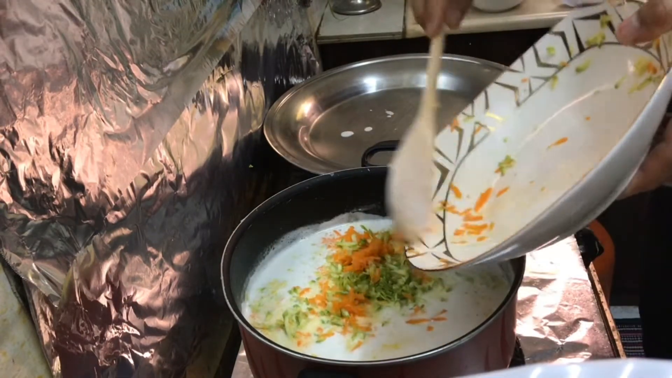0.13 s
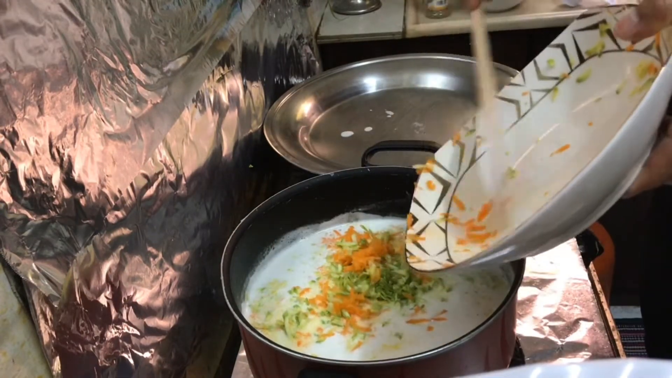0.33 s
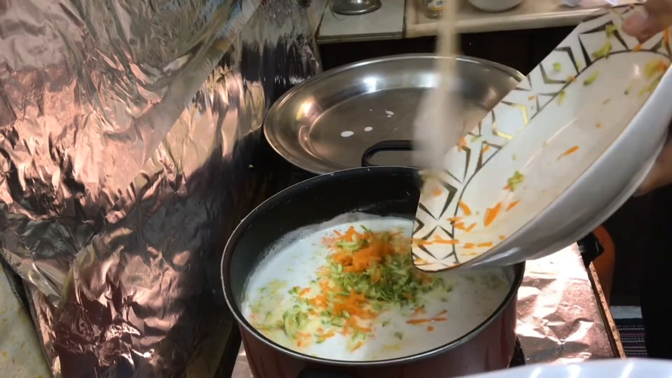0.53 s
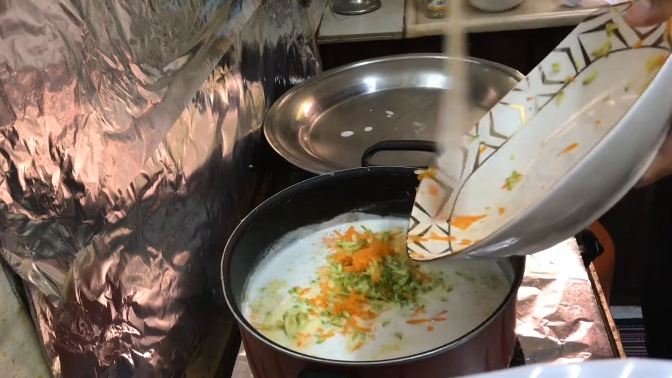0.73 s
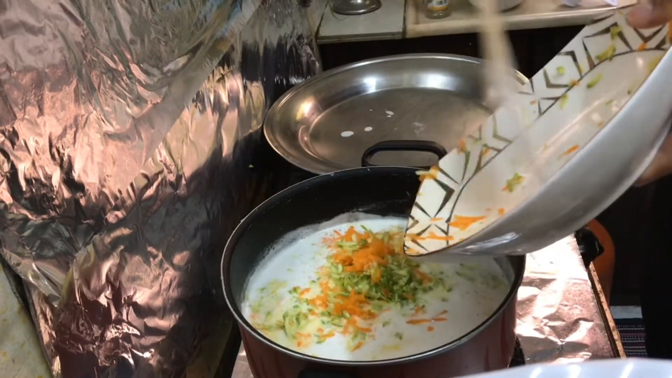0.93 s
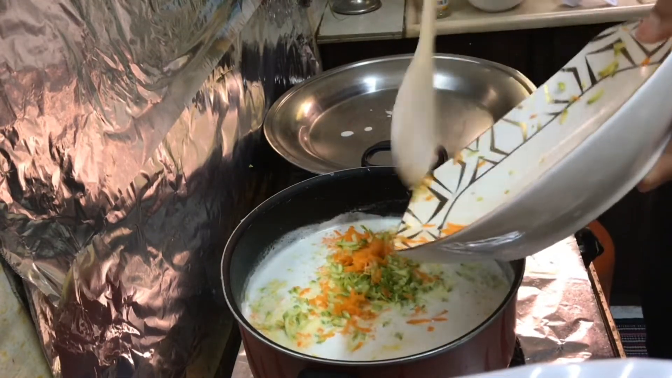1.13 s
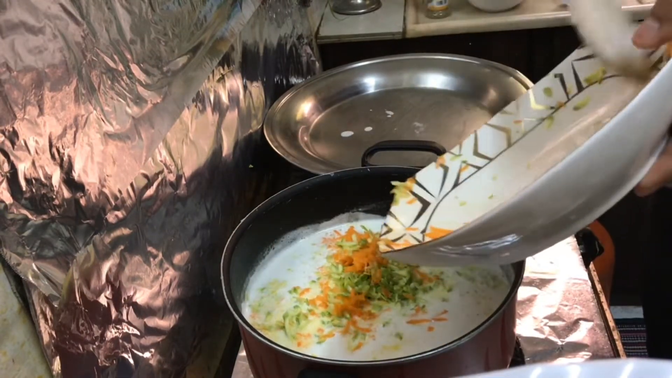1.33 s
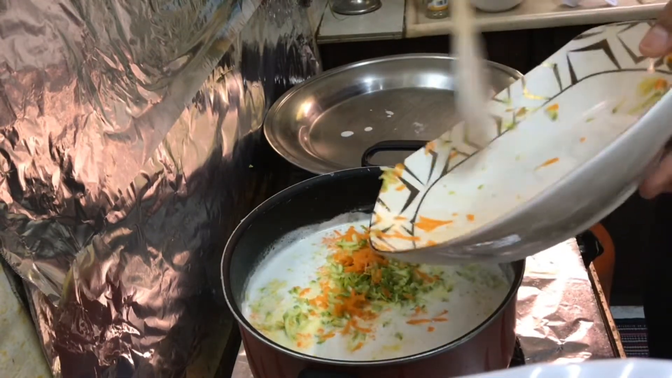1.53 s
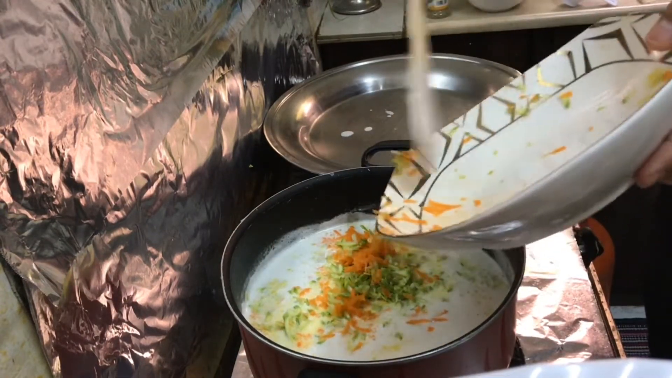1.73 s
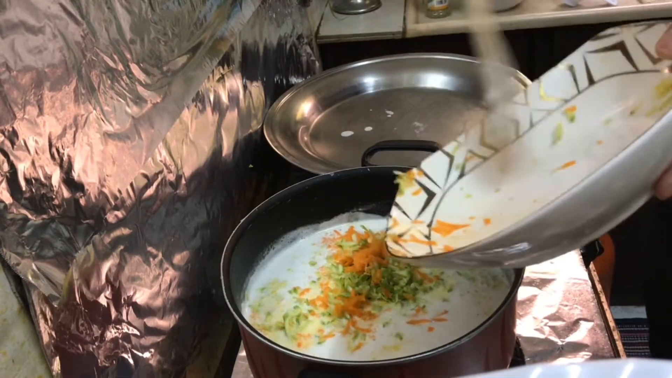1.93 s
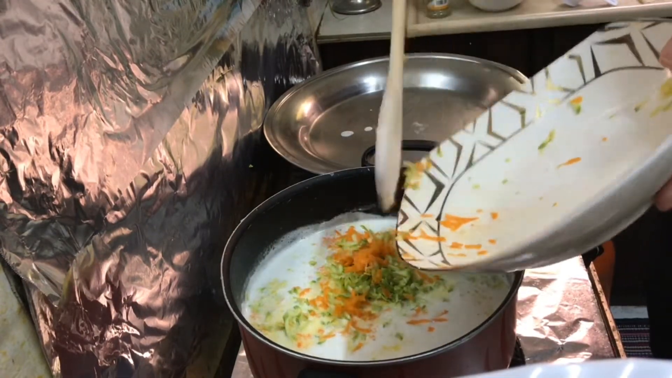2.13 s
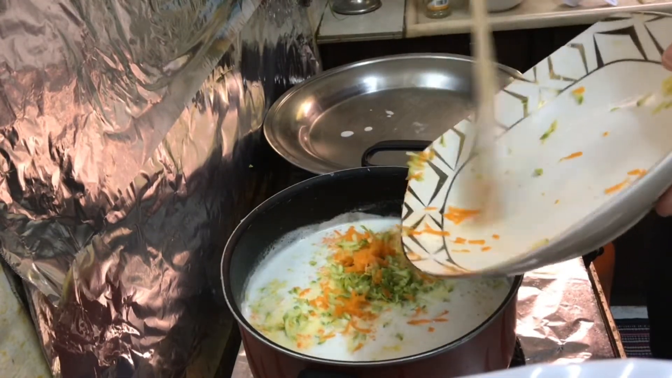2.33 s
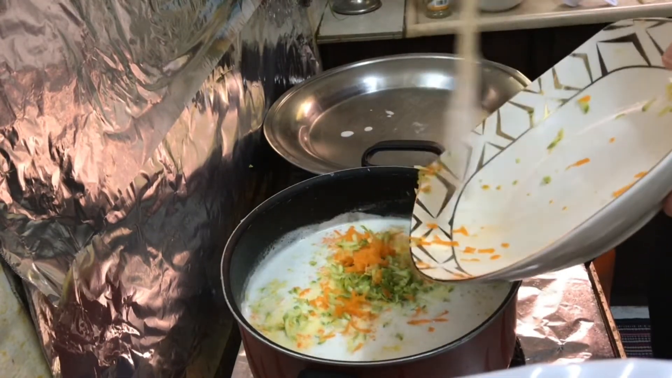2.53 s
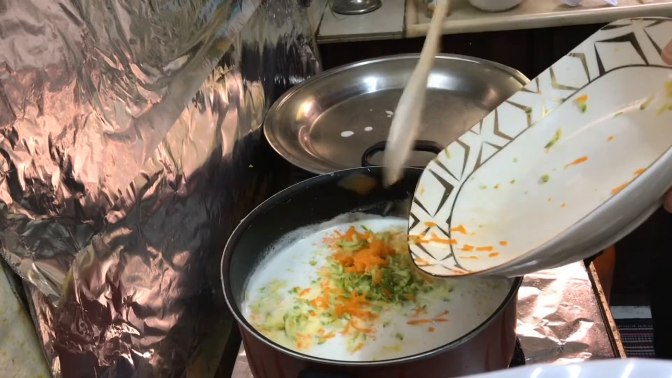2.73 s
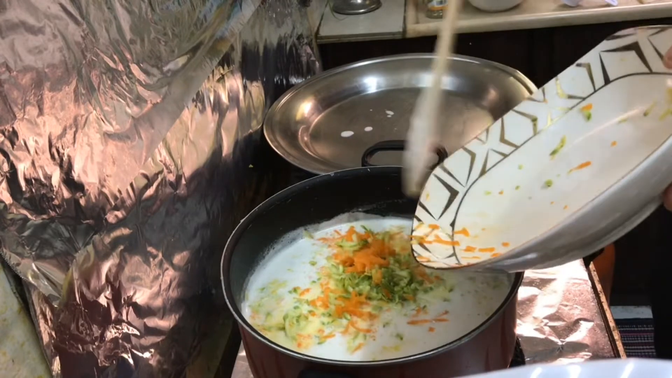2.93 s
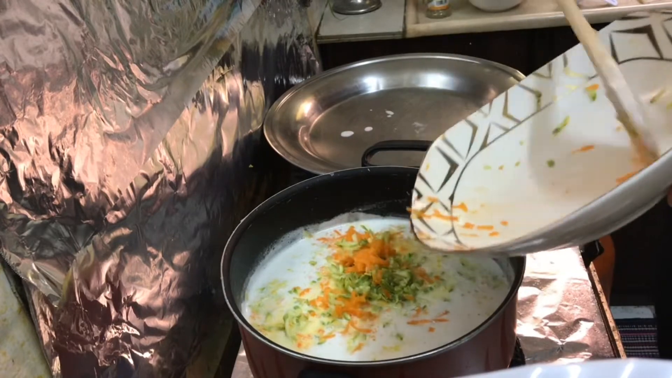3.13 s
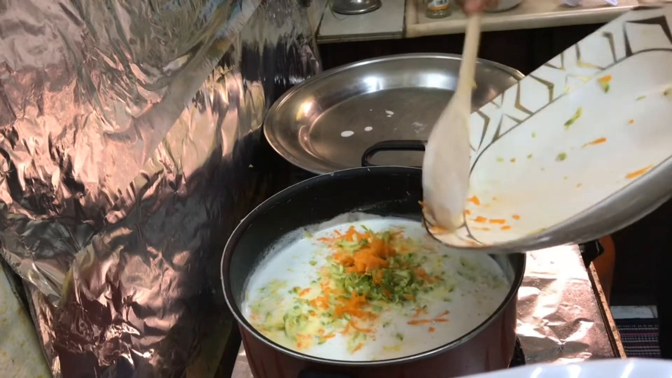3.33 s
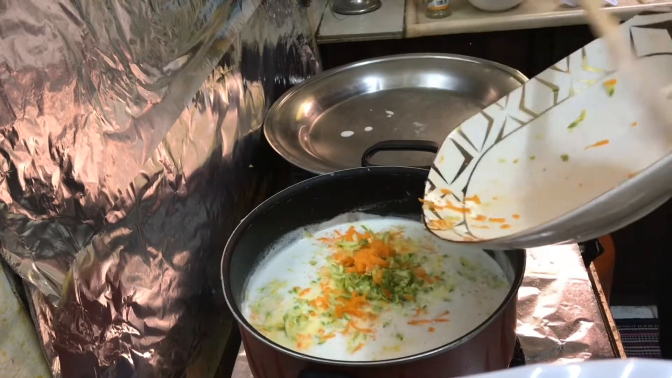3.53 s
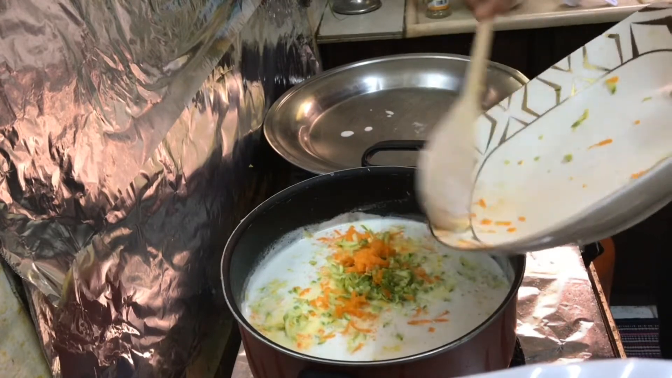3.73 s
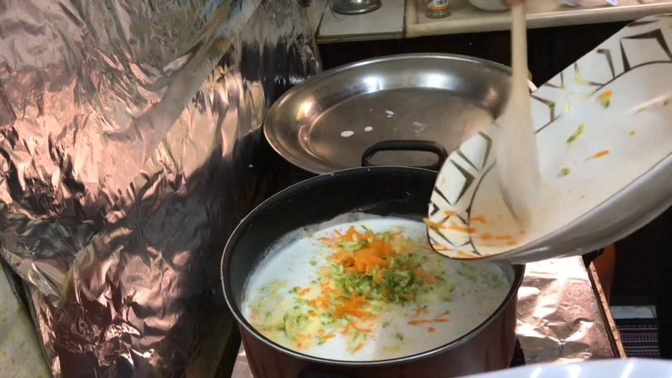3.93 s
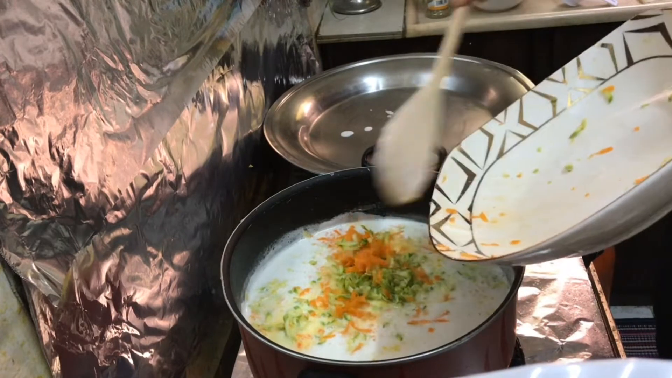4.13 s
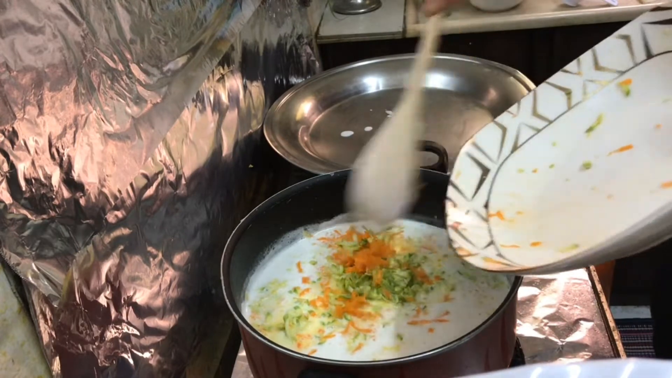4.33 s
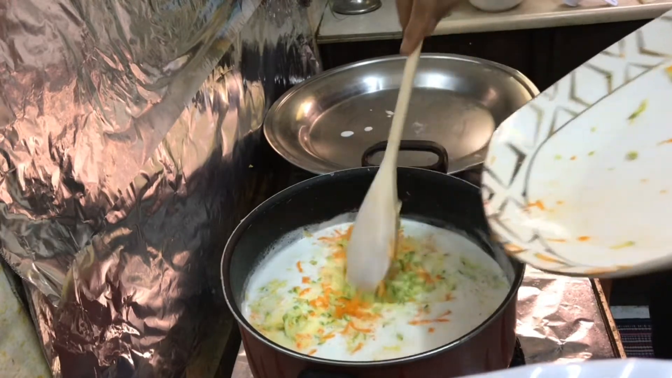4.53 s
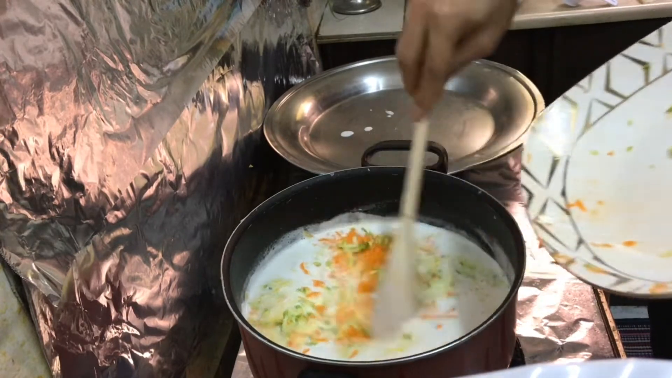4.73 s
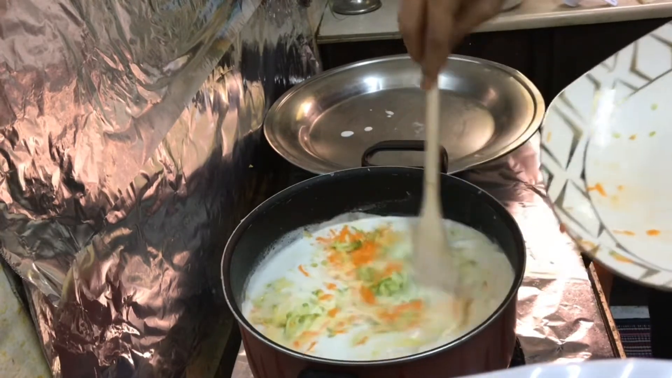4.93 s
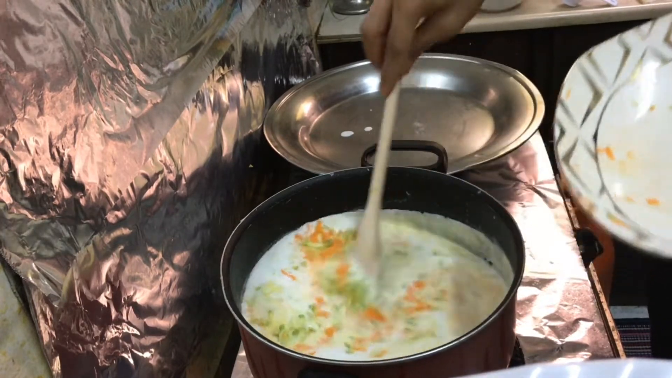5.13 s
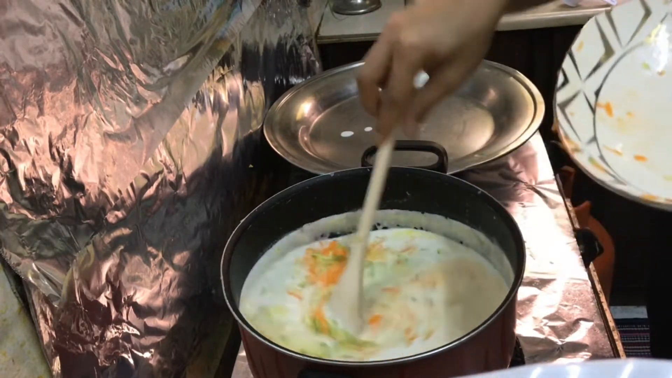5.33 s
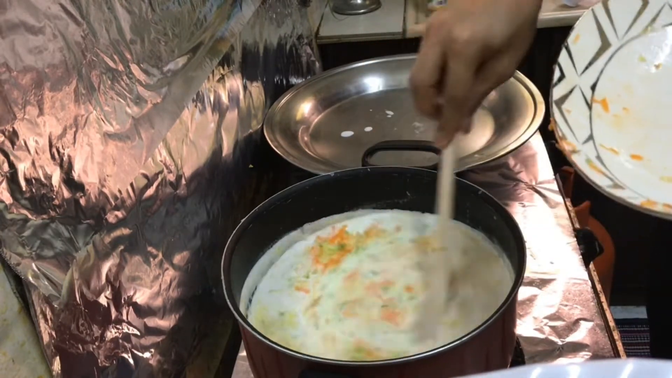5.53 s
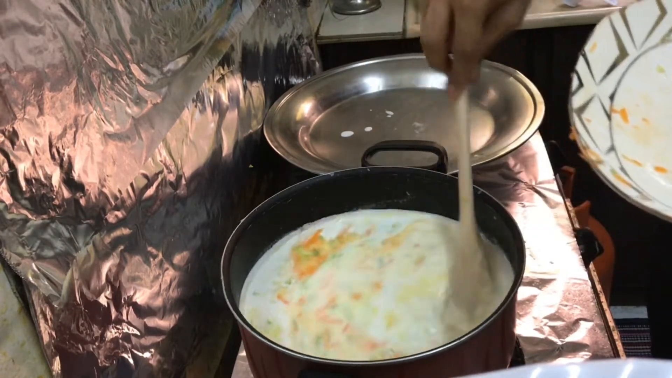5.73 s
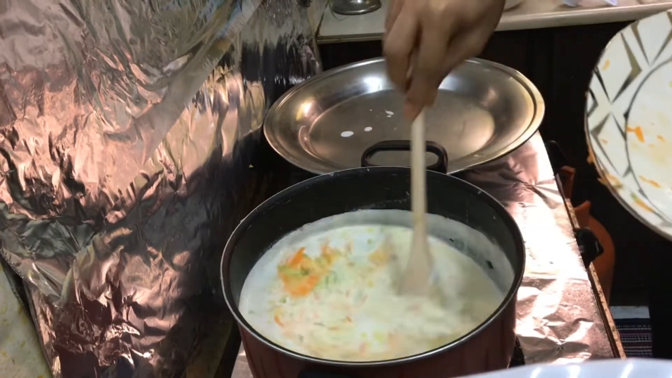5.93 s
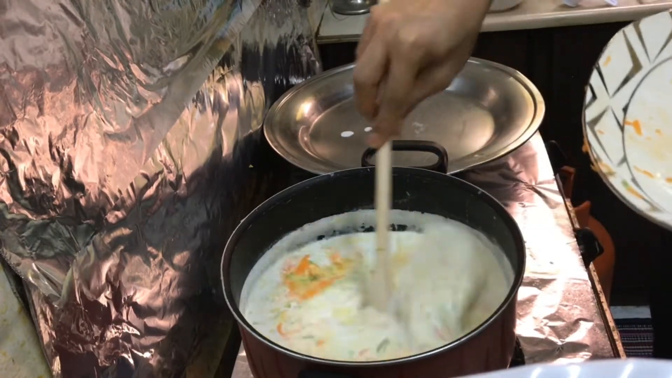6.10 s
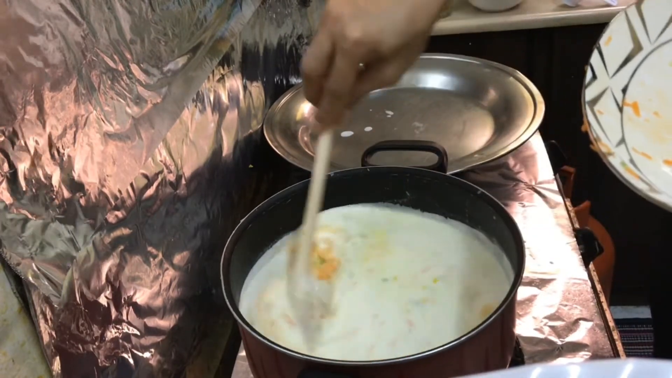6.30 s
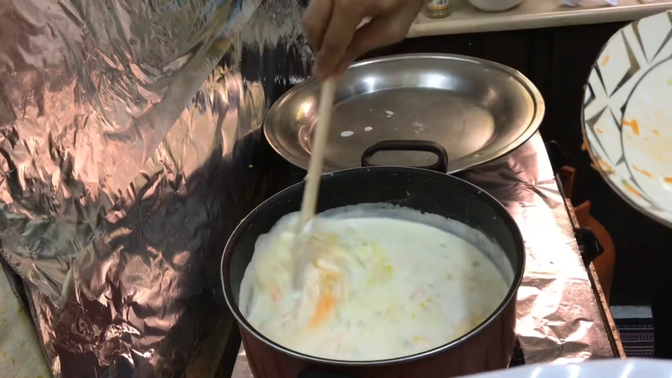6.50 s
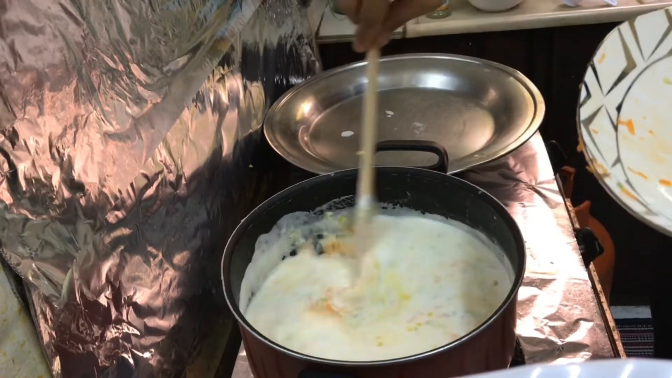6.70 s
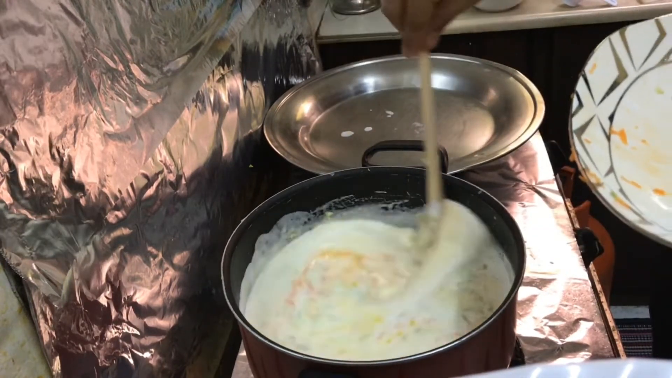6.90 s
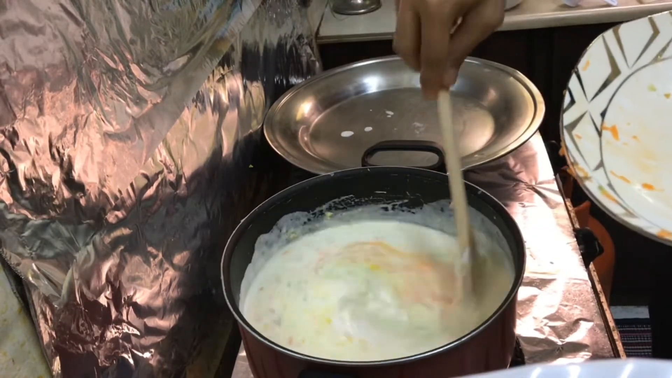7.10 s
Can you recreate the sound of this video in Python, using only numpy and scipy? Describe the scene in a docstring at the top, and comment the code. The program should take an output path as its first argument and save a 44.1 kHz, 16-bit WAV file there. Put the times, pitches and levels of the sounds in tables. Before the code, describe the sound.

Wooden spoon raps sharply on a hand-held ceramic bowl rim about three times a second, then near-silent soup stirring over a low fan hum.

```python
"""A wooden spoon taps the last grated vegetables off a hand-held ceramic bowl, then stirs a pot of milky soup.
Each tap is a dry knock plus fading notes of spoon and bowl, in shares that depend on where it lands.
Behind it a fan hums and rushes (wavering tones and filtered noise) and the pot sizzles faintly (tiny pops).
Wet shreds tick and bubbles squeak in bursts of filtered clicks; the stirring spoon scrapes and the soup sloshes.
A small kitchen answers all but the fan and the sizzle with a short tail and a flutter of echoes."""
import sys
import numpy as np
from scipy import signal
from scipy.fft import rfft, irfft
from scipy.io import wavfile
from scipy.ndimage import uniform_filter1d

SR = 44100
rng = np.random.default_rng(int(sys.argv[2]) if len(sys.argv) > 2 else 0)


def wav_out(sig):
    """Save sig, one row per channel (or a flat mono array), as 16-bit PCM at SR to the path in sys.argv[1]."""
    wavfile.write(sys.argv[1], SR, np.round(np.clip(np.atleast_2d(sig).T, -1, 1) * 32767).astype(np.int16))


N = 315756  # length of the scene in samples


def undb(db):
    """Turn decibels into a gain."""
    return 10 ** (np.asarray(db) / 20)


def level(x, db):
    """Scale a sound to the given average (rms) level in dB."""
    return x * undb(db) / np.sqrt(np.mean(x ** 2))


def across(hz, points, values):
    """Join points by straight lines on a log-frequency axis; beyond the ends the value stays put."""
    return np.interp(np.log(np.maximum(hz, 1)), np.log(points), values)


def colour(x, spectrum, size=2048):
    """Filter with the given (Hz, dB) shape; built from its cepstrum so that it never acts ahead of the sound."""
    points, dbs = np.transpose(spectrum)
    gain = undb(across(np.fft.rfftfreq(size, 1 / SR), points, dbs))
    cepstrum = irfft(np.log(gain))[:size // 2]
    cepstrum[1:] *= 2
    response = irfft(np.exp(rfft(cepstrum, size)))
    return signal.fftconvolve(x, response)[:len(x)]


def resonate(x, hz, width_hz):
    """Let one resonance pass, with gain 1 at its centre."""
    b, a = signal.iirpeak(hz, hz / width_hz, fs=SR)
    return signal.lfilter(b, a, x)


def resonate_twice(x, hz, width_hz):
    """Pass through the same resonance twice, for steeper sides; width_hz is that of each pass."""
    return resonate(resonate(x, hz, width_hz), hz, width_hz)


def split_filter(x, hz, side="low"):
    """Keep the part of a sound below (low) or above (high) a frequency."""
    return signal.sosfilt(signal.butter(2, hz, side, fs=SR, output="sos"), x)


def fade(t, t60):
    """Exponential decay that loses 60 dB in t60 seconds."""
    return np.exp(-np.log(1000) * t / t60)


def add(out, s, x):
    """Mix x in at time s; what falls before the start or after the end is cut off."""
    i = int(s * SR)
    x, i = x[max(-i, 0):], max(i, 0)
    out[i:i + len(x)] += x[:len(out) - i]


def blow(t, split_hz=1500, crack_t60=0.02, rise_s=0.00029):
    """Contact force: one smooth push in the lows, a brief rough crack above."""
    crack = rng.standard_normal(len(t)) * fade(t, crack_t60) * (1 - np.exp(-t / rise_s))
    crack = crack / np.linalg.norm(crack)
    push = signal.unit_impulse(len(t))
    return split_filter(push, split_hz) + split_filter(crack, split_hz, "high")


def ring(t, modes, extra_db, rough, length=1, rough_hz=90):
    """Fading modes (natural tones) of a struck thing; chatter at the contact makes each one uneven."""
    hz, db, t60 = np.transpose(modes)
    # neighbouring modes swing in opposite directions
    gain = undb(db + extra_db) * (-1) ** np.arange(len(hz))
    shape = (len(hz), len(t))
    chance = rng.standard_normal(shape) + 1j * rng.standard_normal(shape)
    chatter = split_filter(chance, rough_hz)
    swing = np.exp(2j * np.pi * hz[:, None] * t) * (1 + rough * chatter / chatter.std())
    return gain @ (swing.imag * fade(t, length * t60[:, None]))


def kitchen(x, first_wall_s=0.0015, count=14):
    """Room reflections: a short diffuse tail, and a flutter between two walls that carries the spoon's note."""
    # How the room's tail dies away. Each row: frequency in Hz, time to fade by 60 dB in seconds,
    # level in dB against the direct sound.
    reverberation = [(200, 0.274, 3), (635, 0.23, 1), (957, 0.25, 1.5), (1590, 0.4, -9), (2486, 0.27, -7.5),
                     (4000, 0.31, -7), (6600, 0.24, -5), (14000, 0.24, -6)]
    echo_s, echo_db = .039, -12  # time of a round trip, gain per trip at the centre
    echo_hz, echo_width_hz = 2190, 930  # the band that survives each trip
    t = np.arange(SR // 2) / SR
    points, t60s, dbs = np.transpose(reverberation)
    hz = np.fft.rfftfreq(len(t), 1 / SR)
    noise = rfft(rng.standard_normal(len(t)))
    tail = np.zeros(len(t))
    # the tail rises from half to one and a half times first_wall_s
    onset = np.clip(t / first_wall_s - .5, 0, 1)
    edges = np.geomspace(100, SR / 2, count)
    for lo, hi in zip(edges, edges[1:]):
        centre = np.sqrt(lo * hi)
        shape = fade(t, across(centre, points, t60s)) * onset
        band = irfft(noise * ((hz >= lo) & (hz < hi)), len(t))
        tail += band * shape / np.linalg.norm(shape) * undb(across(centre, points, dbs))
    out = x + signal.fftconvolve(x, tail)[:len(x)]
    echo = x
    for trip in range(1, 4):
        echo = undb(echo_db) * resonate(echo, echo_hz, echo_width_hz)
        add(out, trip * echo_s, echo)
    return out


def taps():
    """Wood meets the rim: a dry knock, the spoon's short note and the hand-damped ring of the bowl."""
    # The taps. Each row: start in seconds, knock level in dB, treble lift in dB, spoon level in dB,
    # extra level of the spoon's overtones in dB, level of the bowl's low modes in dB, of its high modes in dB.
    tap_list = [(-.04, -1, -7, -12, 2.5, -45, -45), (.038, -11, -2.5, -29.5, 6, -31, -26),
                (.050, -6, -6.5, -23.5, 4, -52, -25.5), (0.298, 0.5, -0.5, -7.5, 5.5, -40.5, -50),
                (0.6356, -6, -0.5, -8.5, -10.5, -57, -53), (0.9606, -1, 1, -5, -6.5, -47, -47),
                (1.2967, -7.5, 9, -41, 2.5, -16, -32), (1.5205, -42, 16, -66, 0, -70, -52),
                (1.847, 1, 2, -11.5, -2.5, -38, -30), (1.922, -22, 11.5, -37.5, -7, -59, -48),
                (2.2863, 4.5, -3, 0, -10, -36, -41), (2.599, 12, -7.5, -19, 13.5, -27, -42),
                (2.846, -5.5, -1.5, -39, 9, -33, -44), (3.094, 3.5, 2, -4, -.5, -37, -27),
                (3.505, 0.5, 2.5, -16.5, 0, -29, -20), (3.9562, 3, -7.5, -8.5, 8, -28, -31),
                (4.214, 5.5, -4, -6.5, -4.5, -15.5, -15)]
    # Natural tones of the spoon. Each row: frequency in Hz, relative level in dB,
    # time to fade by 60 dB in seconds before the tap's own length factor.
    spoon_modes = [(2307.5, -1, 0.067), (2456, -6, 0.032), (2610, -6.5, 0.027), (2950, -12.5, 0.027),
                   (3050, -30, 0.03), (3670, -12, 0.0067), (3812, -5, 0.059), (4070, -45, 0.033),
                   (5780, -17, 0.026), (6000, -22, 0.1), (6520, -26, 0.041), (7030, -18.5, 0.044),
                   (7850, -30, 0.079), (9580, -33, 0.11)]
    # Natural tones of the bowl. Each row: frequency in Hz, relative level in dB,
    # time to fade by 60 dB in seconds.
    bowl_modes = [(583, -11, .18), (628, 5, .04), (1160, -6, .04), (1186, -20, .44), (1803, -3, .13),
                  (2540, -12, .32), (3428, -1, .12), (3822, -19, .22), (4418, -12, .18), (5385, -4, .075),
                  (5572, -17, .1), (6820, -21, .15), (7045, -21, .16), (8157, -13, .1), (9540, -22, .12)]
    # Tone of the dry knock. Each row: frequency in Hz, relative level in dB.
    knock_colour = [(60, -19), (300, 6.5), (500, 12.5), (650, 14.5), (850, 12), (1020, 5.5), (1350, 14.5),
                    (1900, 5), (3100, 9.5), (4700, 5), (7500, 0), (10500, -5), (13000, -9), (16000, -14.5)]
    # a harder tap is brighter and holds the spoon against the rim, which shortens its note
    body_start_db, body_db_per_db = -1, -0.6  # low body of a 0 dB knock; its change per dB of knock
    spoon_length, halving_db = 0.77, 14.5  # length factor at a 0 dB knock; rise in knock that halves it
    out, t = np.zeros(N), np.arange(SR // 2) / SR
    spoon_hz, bowl_hz = np.transpose(spoon_modes)[0], np.transpose(bowl_modes)[0]
    knock_hz, knock_shape_db = np.transpose(knock_colour)
    build_up = 1 - np.exp(-t / .0007)  # the notes take a moment to swell

    for s, knock_db, treble_db, spoon_db, overtone_db, low_db, high_db in tap_list:
        def treble(hz):
            """Lift of the treble by this contact, in dB."""
            return across(hz, [4000, 7000], [0, treble_db])

        body_db = body_start_db + body_db_per_db * knock_db
        length = spoon_length * .5 ** (knock_db / halving_db)
        # the striking point favours some modes
        spoon_extra_db = spoon_db + across(spoon_hz, [2500, 3000], [0, overtone_db]) + treble(spoon_hz)
        spoon = ring(t, spoon_modes, spoon_extra_db, rough=0.038, length=length)
        bowl_extra_db = across(bowl_hz, [1900, 3300], [low_db, high_db]) + treble(bowl_hz)
        bowl_extra_db += across(bowl_hz, [700, 1100], [body_db, 0])
        bowl = ring(t, bowl_modes, bowl_extra_db, rough=0.31)
        body = across(knock_hz, [1300, 2400], [body_db, 0])
        tap_colour_db = knock_shape_db + knock_db + body + treble(knock_hz)
        knock = colour(blow(t), np.column_stack([knock_hz, tap_colour_db]))
        # the bowl moves between taps, so each one meets different reflections
        add(out, s, kitchen((spoon + bowl) * build_up + knock))
    return out


def walk(rate):
    """Slow random wander: levels held 1 / rate seconds, then smoothed twice; typical size 1."""
    k = int(SR / rate)
    held = np.repeat(rng.standard_normal(N // k + 1), k)
    smooth = uniform_filter1d(uniform_filter1d(held, k), k)[:N]
    return level(smooth, 0)


def fan(flicker_db=2.0):
    """A motor hums with slightly wavering tones; its air rushes evenly through a few duct resonances."""
    # Tones of the motor. Each row: frequency in Hz, average (rms) level in dB, typical wander in Hz.
    hum_tones = [(59.6, -55, 1.89), (83.6, -57, 3.43), (120, -39.5, 0.25), (140.3, -53, 1.49),
                 (280, -59.5, 2.745)]
    # Resonances of the fan's air. Each row: frequency in Hz, width of each filter pass in Hz,
    # average (rms) level in dB.
    air_modes = [(56.7, 17, -58.5), (146.7, 27, -50.5), (181, 59, -53.5), (272.5, 45, -62),
                 (371.8, 31, -55.5), (415, 40, -52.5), (519.4, 55, -54), (724, 32, -58), (2010, 190, -64.5)]
    # Tone of the steady rush of fan and burner. Each row: frequency in Hz, relative level in dB.
    rush_colour = [(25, -13), (60, -17), (100, 2.5), (170, -11.5), (240, -5.5), (600, -1), (850, -7),
                   (1100, -12.5), (2300, -14), (3000, -19), (4200, -18), (6500, -25.5), (9000, -28),
                   (16000, -32.5)]
    out = level(colour(rng.standard_normal(N), rush_colour), -48)
    for hz, db, wander_hz in hum_tones:
        phase = 2 * np.pi * np.cumsum(hz + wander_hz * walk(7)) / SR
        # tones that wander more also flicker more: flicker_db is per Hz of wander
        flicker = undb(flicker_db * wander_hz * walk(6))
        out += level(np.sin(phase) * flicker, db)
    for hz, width_hz, db in air_modes:
        out += level(resonate_twice(rng.standard_normal(N), hz, width_hz), db)
    return out


def sizzle(effort, pops_per_s=2500, spread_db=2.0):
    """Tiny bubbles burst at the hot wall of the pot, more loudly once stirring washes milk up it."""
    # Tone of the sizzle. Each row: frequency in Hz, relative level in dB.
    pop_colour = [(1500, -14), (4000, -7), (6500, -1), (10000, 2.5), (13000, 3.5), (16000, 4.5)]
    # the sizzle grows once stirring starts and flares with each stroke
    stir_start_s, rise_s = 4.26, 1
    rest_db, stirred_db, flare_db = -71, -60, -8  # flare is against the stroke
    happens = rng.random(N) < pops_per_s / SR
    sizes = undb(spread_db * rng.exponential(size=N))
    pops = happens * rng.choice([-1, 1], N) * sizes
    wetted = np.clip((np.arange(N) / SR - stir_start_s) / rise_s, 0, 1)
    steady = undb(rest_db + wetted * (stirred_db - rest_db))
    return level(colour(pops, pop_colour), 0) * (steady + undb(flare_db) * effort)


def wet_grains(count, hz, width_hz, grain_db=9):
    """Dense tiny clicks of uneven size in one resonance; average (rms) level 1."""
    grains = rng.standard_normal(count) * undb(grain_db * rng.standard_normal(count))
    return level(resonate_twice(grains, hz, width_hz), 0)


def wet_burst(db, hz, width_hz, length):
    """A short cluster of wet clicks that fades by 30 dB in length seconds."""
    t = np.arange(SR // 5) / SR
    return undb(db) * wet_grains(len(t), hz, width_hz) * fade(t, 2 * length)


def ticks():
    """Wet shreds smear and let go in short clusters of clicks."""
    # Ticks of shreds and spoon. Each row: start in seconds, level before the fade in dB,
    # centre frequency in Hz, time to fade by 30 dB in seconds.
    tick_list = [(1.491, -43, 7000, 0.03), (1.522, -42.5, 5800, 0.069), (1.58, -46, 5500, 0.032),
                 (1.725, -42, 7500, .0085), (4.644, -47.5, 4030, 0.022), (6.7203, -40, 3200, 0.0079),
                 (6.7215, -35, 8300, .005), (6.9492, -45, 5500, .02), (7.002, -44, 4700, 0.011)]
    out = np.zeros(N)
    for s, db, hz, length in tick_list:
        add(out, s, wet_burst(db, hz, 1.5 * hz, length))
    return out


def bubbles():
    """Small bubbles burst with a squeak: the same wet clicks in a narrow resonance."""
    # Bursting bubbles. Each row: start in seconds, level before the fade in dB,
    # centre frequency in Hz, time to fade by 30 dB in seconds.
    bubble_list = [(4.7098, -51, 8240, .016), (5.568, -50, 9300, .021), (5.976, -51.5, 7800, .02),
                   (6.74, -57, 6400, .15)]
    out = np.zeros(N)
    for s, db, hz, length in bubble_list:
        add(out, s, wet_burst(db, hz, 700, length))
    return out


def stroke_effort():
    """Push of the spoon, as a gain: each stroke swells, holds and fades."""
    # Strokes through the soup and along the pot. Each row: start in seconds, length in seconds, level in dB.
    stroke_list = [(5.735, 0.075, -60), (5.846, 0.085, -54.5), (5.967, .094, -55.5), (6.708, .35, -60.5)]
    out = np.zeros(N)
    for s, length, db in stroke_list:
        add(out, s, undb(db) * signal.windows.tukey(int(length * SR), .5))
    return out


def stirring(effort):
    """The spoon scrapes softly along the pot and the soup sloshes round it."""
    scrape = wet_grains(N, hz=3400, width_hz=5800)
    slosh = undb(-4) * wet_grains(N, hz=790, width_hz=920)
    return effort * (scrape + slosh)


def scene():
    """Spoon, bowl and pot in the kitchen, over the fan."""
    effort = stroke_effort()
    wet_sounds = kitchen(ticks() + bubbles() + stirring(effort))
    return (taps() + fan() + sizzle(effort) + wet_sounds)[None]


def record(dry):
    """The microphone colours the treble; the recorder clips at full scale and cuts the top."""
    # Ripple of the microphone. Each row: frequency in Hz, gain in dB.
    mic_ripple = [(3400, -0.5), (4200, -2), (4950, -4.5), (5600, -1), (6400, -0.5), (7700, -5.5),
                  (8500, -2.5), (9500, -4.5), (10400, -8.5), (11400, -4)]
    top_hz = 15900
    heard = np.clip(colour(dry[0], mic_ripple), -1, 1)
    return signal.sosfilt(signal.ellip(10, .2, 80, top_hz, fs=SR, output="sos"), heard)[None]


dry = scene()
out = record(dry)
wav_out(out)
```